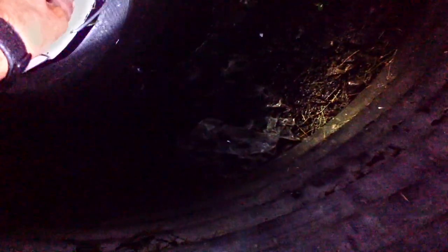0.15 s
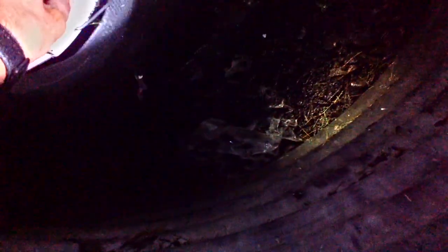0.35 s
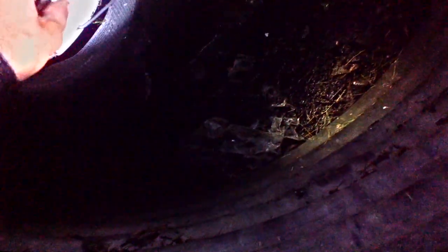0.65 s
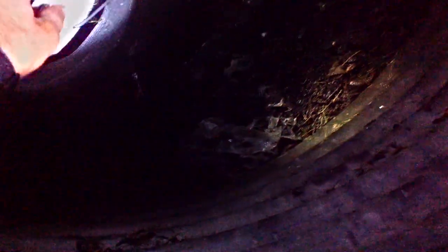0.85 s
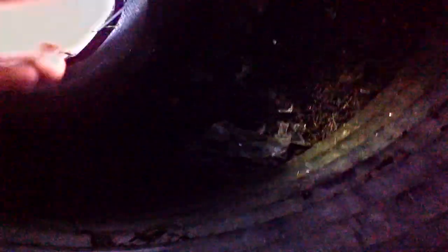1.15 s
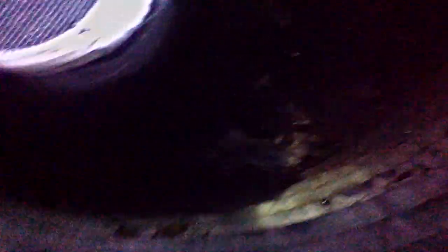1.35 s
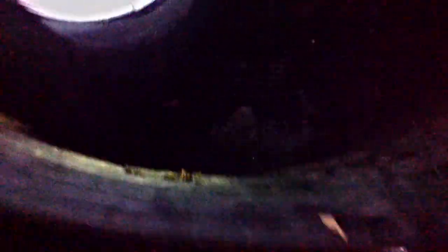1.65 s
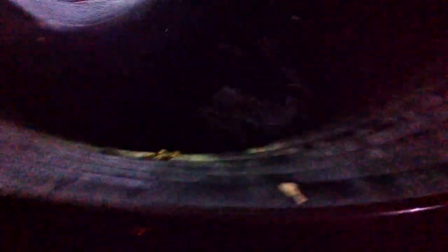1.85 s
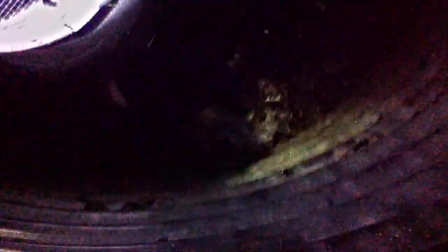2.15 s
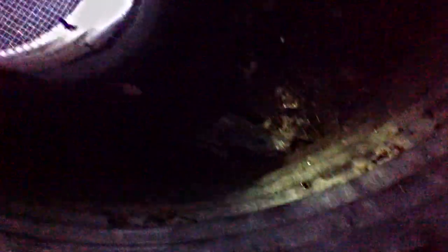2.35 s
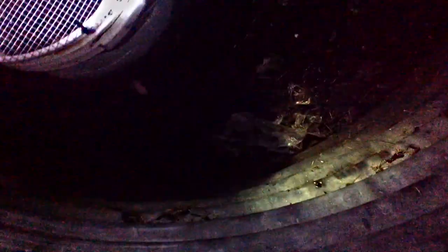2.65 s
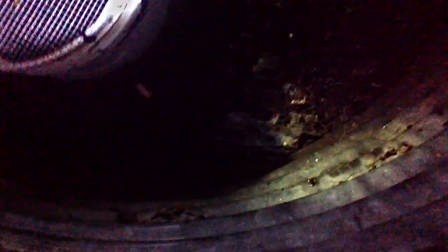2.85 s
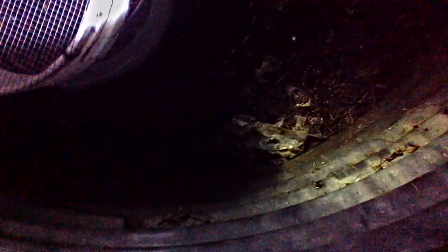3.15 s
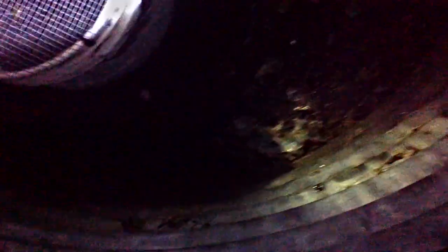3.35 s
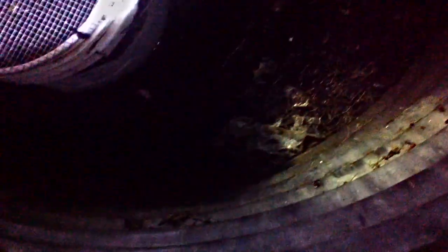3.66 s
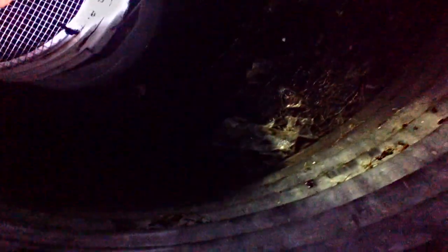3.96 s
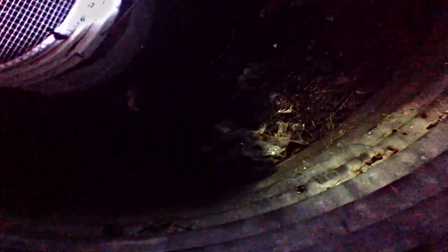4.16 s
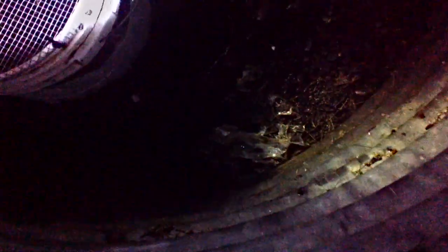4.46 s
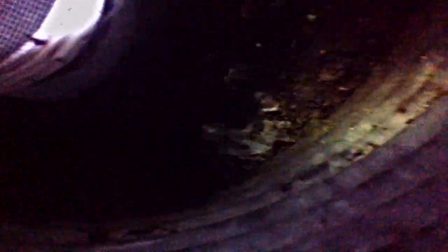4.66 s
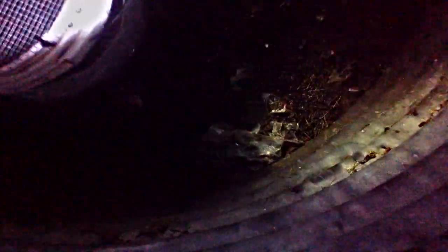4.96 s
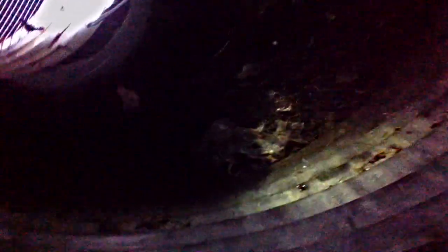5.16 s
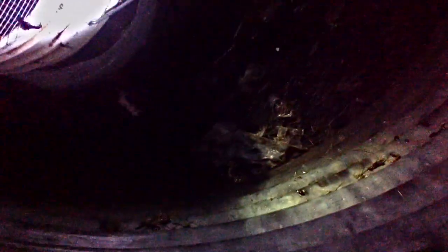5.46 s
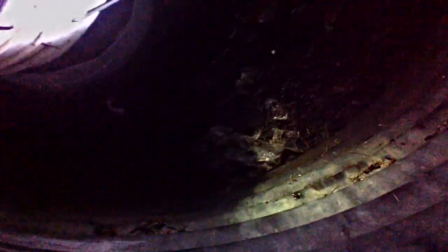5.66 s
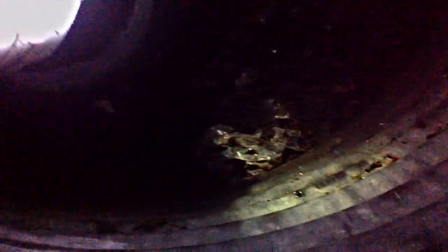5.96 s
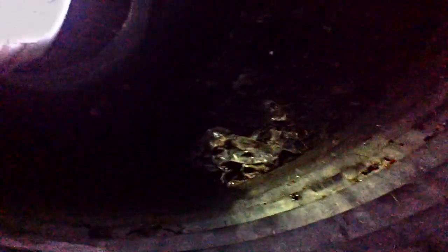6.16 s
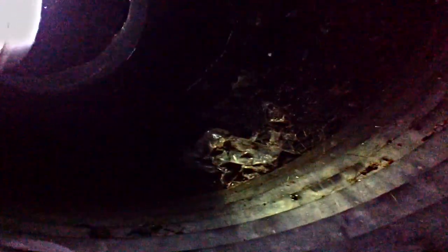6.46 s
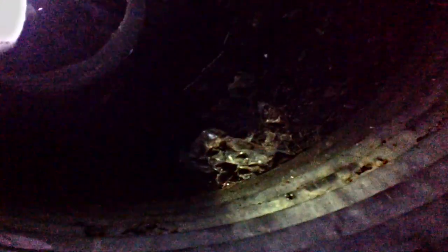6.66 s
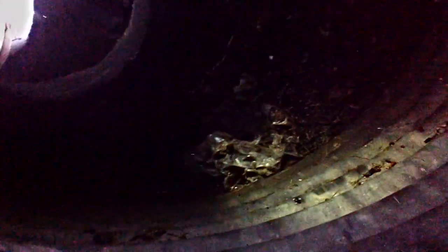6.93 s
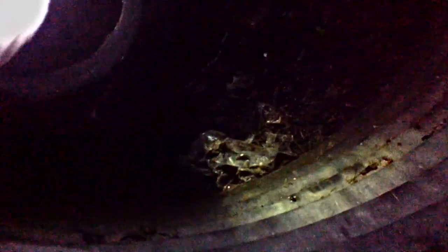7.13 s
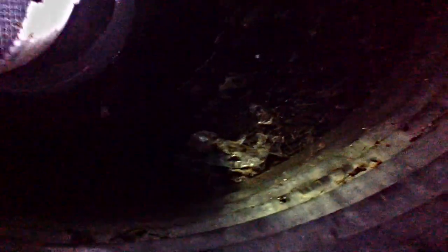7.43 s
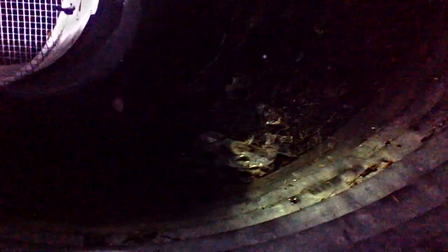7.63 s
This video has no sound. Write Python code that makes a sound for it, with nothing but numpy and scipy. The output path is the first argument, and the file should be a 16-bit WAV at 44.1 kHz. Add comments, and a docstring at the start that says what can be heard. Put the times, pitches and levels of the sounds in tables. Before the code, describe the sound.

Water drips and plops ringingly inside a ribbed drain pipe over a thin trickling stream, while wind rumbles and thumps on the microphone.

```python
"""Water drops splash in a ribbed drain pipe: they slap its cross modes into ringing, throw noisy spray
and mist, and trap bubbles that sing as damped sines. A stream of patchy noise and tiny bubbles runs
below, and a short noise tail stands for the echo. Wind gusts rumble, throb and flutter on a small
microphone in the pipe's mouth; low knocks are wind pops where loud, probably thuds of drops where
quiet. The strongest peaks overload it. Behind are a low hum of air and a hollow wash of far water."""
import sys
import numpy as np
from scipy import signal
from scipy.fft import rfft, irfft, next_fast_len
from scipy.io import wavfile
from scipy.ndimage import uniform_filter1d, map_coordinates

SR = 44100
rng = np.random.default_rng(int(sys.argv[2]) if len(sys.argv) > 2 else 0)


def generate_wav(signal):
    """Clip the signal to [-1, 1] and save it as 16-bit WAV at the path in sys.argv[1]."""
    frames = np.transpose(np.atleast_2d(signal))
    scaled = np.clip(frames, -1, 1) * 32767
    pcm = np.round(scaled).astype(np.int16)
    wavfile.write(sys.argv[1], SR, pcm)


N = 343519

# colour of a drop's own knock and of a low knock's bright edge: (frequency [Hz], relative level [dB])
KNOCK_COLOUR = [(250, -66), (500, 6), (800, 0.5), (1200, -18), (2000, -26), (5000, -80)]


def drops():
    """Each drop slaps the water into the pipe's modes, throws spray and mist and traps a few bubbles."""
    # the clearest drops, before each layer's trim: (time [s], peak [dB], bubble pitch [Hz],
    # slap [dB re peak], spray [dB re peak], mist [dB re peak], bubble [dB re peak])
    clear_drops = [(0.0867, -19, 1840, -6, -20, -16, -4.5), (0.2204, -19.5, 1520, -26, -24, -14, -2),
                   (0.2578, -20, 3200, -22, -12, -29, -3), (0.4508, -27, 1030, -16, -5, -7, -5),
                   (0.6324, -23, 6130, -19, -3.5, -12, -7), (0.7761, -24.5, 8410, -16, -8, -19, -3),
                   (0.859, -24.5, 1460, -21, -9, -8, -10), (0.9388, -16, 8600, -8.5, -14, -24, -3.5),
                   (0.9822, -22, 9920, -15, -17, -11, -4), (0.9916, -17.5, 2340, -21, -5, -7, -4.5),
                   (1.0585, -7.5, 4510, -13, -24, -9, -3), (1.1129, -19, 6200, -28, -12, -16, -2.5),
                   (1.1835, -24.5, 1610, -17, -10, -6, -14), (1.341, -24, 1830, -8, -10, -25, -4),
                   (1.3907, -17, 3120, -10, -3.5, -10.5, -4),
                   (1.4686, -13.5, 1840, -12, -12.5, -10.5, -3.5), (1.5648, -23, 1620, -2, -8, -21, -3),
                   (1.6212, -19, 1810, -10, -8.5, -18, -3), (1.6736, -24.5, 8800, -17, -26, -6, -3),
                   (1.697, -24, 2220, -8, -23, -25, -1), (1.735, -24, 1620, -9, -26, -25, -3),
                   (1.8056, -32, 1590, -9, -23, -27, 2), (1.948, -17, 8400, -20, -31, -5, -2),
                   (1.9834, -30, 1380, -20, -16, 0, -7), (2.0812, -18, 2140, -6, -10, -35, -3.5),
                   (2.139, -24, 2760, -16, -7, -18, -4), (2.1565, -13.5, 4660, -10, -7, -13.5, -5.5),
                   (2.2004, -26, 1350, 0, -7, -2, -12), (2.2593, -20.5, 2480, -15, -19, -36, -1),
                   (2.2917, -10, 2780, -18, -15, -31, -2), (2.4418, -21.5, 2810, -14, -15, -9, -3),
                   (2.5122, -26, 6690, -14, -13, -15, -3), (2.5287, -21, 1540, -14, -25, -18, -2),
                   (2.665, -27.5, 7600, -20, -12, -10, 2), (2.6908, -19.5, 1710, -1.5, -7.5, -8, -6),
                   (2.7382, -16.5, 8000, -11, -6, -10, -7), (2.798, -20, 9710, -22, -21, -10, -1),
                   (2.8509, -20, 2160, -22, -12, -11, -9), (2.8714, -10.5, 2800, -8.5, -11, -19, -3),
                   (2.9088, -11, 1590, -9, -4, -14, -4), (2.9362, -13, 1740, -11, -0.5, -5.5, -5),
                   (3.028, -25, 1500, -3, -28, -26, -8), (3.1163, 0, 1790, -8, -5, -26, -4.5),
                   (3.1941, -17, 3080, -14, -29, -33, -2), (3.3817, -14.5, 1570, -5.5, -3.5, -8, -20),
                   (3.4511, -13, 2380, -5.5, -21, -43, -0.5), (3.684, -22.5, 1550, -1, -11, -12, -7),
                   (3.7359, -3.5, 1456, -11, -18, -20, -4), (3.8691, -34, 1090, -6, -13, -22, -9),
                   (3.9225, -23.5, 2150, -17, -2.5, -7, -4), (4.129, -29.5, 2900, -18, -19, -25, 3),
                   (4.1874, -33, 1080, -18, -16, -6, -11), (4.2343, -16, 1540, -10, -2.5, -11, -3),
                   (4.2572, -10.5, 1490, -15, -23, -12.5, -2), (4.5655, -19, 1710, -17, -20, -33, -1.5),
                   (4.6147, -23.5, 1490, -5, -11, -13, -9), (4.6872, -18, 9200, -15, -9, -9, -7),
                   (4.7566, -24, 1070, -16, -3, -1, -4), (4.8448, -20.5, 1530, -6, -10, -17, -8),
                   (4.8908, -14, 6870, -14, -10, -11, -1.5), (5.0285, -20, 1590, -24, -17, -10, -3),
                   (5.2739, -27, 2700, -8, -13, -23, 0), (5.3232, -24.5, 1600, -9, -23, -13, 0.5),
                   (5.376, -22.5, 5750, -11, -10, -5, -6), (5.47, -21.5, 1040, -9, -7, -14, -5.5),
                   (5.5253, -15, 1560, -14, -18, -22, -2), (5.5872, -20, 3180, -5, -20, -18, -3),
                   (5.655, -21, 1750, -26, -28, -30, -0.5), (5.8197, -5, 1480, -2, -8.5, -20, -8.5),
                   (5.876, -14.5, 1390, -1.5, -21, -21, -6), (5.9399, -16.5, 2230, -6.5, -24, -32, -2),
                   (6.0826, -12, 1450, -1.5, -11.5, -21, -4), (6.164, -25, 1520, -5, -23, -33, -4),
                   (6.2148, -15.5, 2180, -30, -19, -42, -2), (6.258, -20.5, 1990, -14, -8, -17, -6),
                   (6.5286, -30, 1520, -14, -13, -25, 0), (6.5665, -16.5, 2480, -23, -17, -34, -2),
                   (6.5954, -22, 2070, -11, -10, -29, -5), (6.6089, -10, 2860, -30, -18, -22, -3.5),
                   (6.6837, -20, 1800, -14, -19, -24, -2), (6.8219, -21.5, 1870, -15, -2, -5, -6),
                   (6.8533, -22.5, 1630, -5, -17, -19, -6), (6.8996, -22.5, 1620, -10, -8, -20, -4),
                   (6.9451, -19, 1940, -25, -27, -35, -2.5), (7.0658, -28.5, 1100, -9, -0.5, -4, -14),
                   (7.1844, -23, 1080, -2.5, -11, -13, -6), (7.1975, -19.5, 6400, -20, -12.5, -16, -2),
                   (7.2544, -20, 1670, -5, -8, -13, -4), (7.2688, -15, 1020, 2, -1.5, -13, -9),
                   (7.3332, -31, 2260, -17, -17, -9, -8), (7.3512, -16.5, 1550, 3.5, -13, -15.5, -5),
                   (7.3906, -13, 2380, -5, -21, -18, -5.5), (7.4395, -22.5, 1060, 1, -13, -24, -2),
                   (7.4644, -15, 1110, -2.5, -27, -22, -4), (7.5113, -15, 2470, 0.5, -9, -18, -4),
                   (7.5697, -28, 1100, -7, -18, -25, -6), (7.5852, -18.5, 1060, 3.5, -6, -24, -9),
                   (7.633, -19.5, 1030, -7, -11, -23, -6), (7.649, -14.5, 2240, -3.5, -18, -25, -4.5),
                   (7.7408, -22.5, 1000, 1, -16, -17, -7)]
    # colours of coarse spray and fine mist: (frequency [Hz], relative level [dB])
    spray_colour = [(1500, -13), (3200, 1), (4500, 1), (7000, -1.5), (8500, -11.5), (12000, -44)]
    mist_colour = [(4000, -46), (7000, -3.5), (8500, 0.5), (10500, -2.5), (14500, -9), (22050, -20)]
    rows = np.vstack([clear_drops, small_drops()])
    s, db, hz, slap_db, spray_db, mist_db, bubble_db = rows.T
    fade_db = -27.5  # fade of slap and knock per 50 ms; spray and mist fade faster
    tick_fade_db = -150  # per 50 ms: the first contact is a dry click
    swell = 0.0054 * amp(0.35 * db)  # rise time [s]: more water takes longer to land
    grain = amp(2.24 * wobble(250))  # a splash is many droplets
    wash_slap, wash_spray = washes()

    def driven_modes(f):
        return pipe(f) * f ** 2 / (f ** 2 + 800 ** 2)  # little drive below the first cross mode

    slap_level = bursts(np.abs(s - swell), db + slap_db - 7.5, fade_db, rise=swell) + wash_slap
    slap = slap_level * unit(grain * filtered(rng.standard_normal(N), driven_modes))

    spray_level = bursts(s, db + spray_db - 6.0, 1.15 * fade_db, rise=0.4 * swell)
    mist_level = bursts(s, db + mist_db - 5.0, 1.5 * fade_db, rise=0.00065)
    mist_level += bursts(s, db + mist_db - 16.5, tick_fade_db, rise=0.0002)
    spray = (spray_level + 1.1 * wash_spray) * unit(grain * rush(spray_colour, patchy_db=8.0))
    mist = (mist_level + wash_spray) * unit(grain * rush(mist_colour, patchy_db=-1.5))

    first = bubbles(s + 0.6 * swell, hz, amp(db + bubble_db), 3 + hz / 900, rise=0.0078)
    # three smaller bubbles of similar pitch follow
    draw = rng.random((len(s), 3, 2))
    late = s[:, None] + 0.00196 + (0.008 + 3 * swell[:, None]) * draw[..., 0]
    near = hz[:, None] * np.exp(0.31 * (draw[..., 1] - 0.5))
    late, near = late.ravel(), near.ravel()
    size = np.repeat(amp(db + bubble_db - 9.5), 3)

    knock_level = bursts(s, db + slap_db - 20.5, fade_db, rise=swell)
    knock = knock_level * rush(KNOCK_COLOUR, patchy_db=4.5)
    followers = bubbles(late, near, size, 2.7 + near / 1200, rise=0.028)
    return knock + slap + spray + mist + first + followers


def small_drops():
    """Faint drops that fall at random, as rows like those of the clear drops."""
    count = 45
    top_db, scatter_db = -24, 4  # highest peak, and scatter below it
    middle_hz, log_spread = 1980, 0.533  # bubble pitch before limiting
    # slap, spray, mist and bubble under the peak [dB], and the scatter of each [dB]
    mix_db, mix_scatter_db = (-12, -9.5, -14.5, -4.5), (6.6, 4.7, 3.6, 5.8)
    when = rng.random(count) * N / SR
    draw = rng.standard_normal((count, 2 + len(mix_db)))
    peak_db = top_db - scatter_db * np.abs(draw[:, 0])
    hz = np.clip(middle_hz * np.exp(log_spread * draw[:, 1]), 1000, 10000)
    return np.column_stack([when, peak_db, hz, mix_db + mix_scatter_db * draw[:, 2:]])


def washes():
    """Slap and spray gains of water sheets falling back after big splashes, sinking toward their end."""
    # sheets, before the layers' trims: (time [s], length [s], slap [dB], spray [dB])
    sheets = [(2.528, 0.091, -34.5, -43), (3.024, 0.12, -35.5, -41), (3.12, 0.036, -14.5, -19.5),
              (3.363, 0.22, -30.5, -36), (3.73, 0.072, -24, -34.5), (4.242, 0.14, -28, -31),
              (4.911, 0.042, -33, -33.5), (5.84, 0.33, -43, -55), (6.096, 0.79, -40.5, -51),
              (7.347, 0.3, -43, -47.5)]
    t = np.arange(N) / SR
    lift = np.zeros((2, N))
    for s, length, *db in sheets:
        part = (t - s) / length
        grow = np.clip(part / 0.077, 0, 1)
        sink = np.clip((1.25 - part) / 1.38, 0, 1)
        lift += amp(db)[:, None] * grow * sink
    return lift


def pipe(hz):
    """Response of the pipe's cross modes: resonances across its width, with alternating sign."""
    # cross modes: (frequency [Hz], width [Hz], relative level [dB])
    cross_modes = [(1043, 61, 2), (1512, 156, 4), (1774, 550, -3), (2310, 325, -1.5), (3000, 610, -14),
                   (4450, 480, -14)]
    total = 0
    for k, (centre, width, db) in enumerate(cross_modes):
        loss = 1j * hz * width
        total = total + (-1) ** k * amp(db) * loss / (centre * centre - hz * hz + loss)
    return total


def bubbles(start, hz, size, cycles, rise):
    """Trapped air rings as damped sines; a positive rise glides the pitch up, as near the surface."""
    step = np.arange(1024)
    turns = hz[:, None] * step / SR
    life = turns / cycles[:, None]  # age in decay times
    tone = np.sin(2 * np.pi * turns * (1 + rise * np.minimum(life, 3)))
    ring = tone * np.exp(-life) * (1 - np.exp(-turns / 0.53))
    where = np.round(start * SR).astype(int)[:, None] + step
    return np.bincount(where.ravel(), (size[:, None] * ring).ravel(), N + SR)[:N]


def stream():
    """Running water: noise of the flow, small splashes that make it flare, and a crowd of tiny bubbles."""
    # base levels of the flow, before trims: (time [s], gurgle [dB], fizz [dB])
    flow_levels = [(0.0, -38, -39), (0.5, -41.5, -40), (1.65, -41, -43.5), (2.62, -44.5, -42.5),
                   (3.03, -40, -44), (3.84, -43, -42), (5.6, -40, -40), (6.27, -36, -44.5),
                   (6.88, -43, -44.5), (7.22, -40, -49), (7.48, -41, -43), (7.79, -36, -38)]
    # colours of low gurgle and high fizz: (frequency [Hz], relative level [dB])
    gurgle_colour = [(300, -3), (670, -8.5), (900, -22.5), (1060, -6), (1200, -13), (1620, -3),
                     (2400, -8.5), (3700, -14.5), (7000, -23)]
    fizz_colour = [(1500, -18), (3000, 2), (4500, -1.5), (6500, 0), (9300, -1), (11500, -5.5),
                   (14500, -13.5), (22050, 3)]
    gurgle_db, fizz_db = curves(flow_levels)

    # each small splash makes the noise flare and fade
    draw = rng.random((260, 2))
    kick_size = amp(-7 * np.log(draw[:, 1] + 0.033))
    kicks = np.bincount((draw[:, 0] * N).astype(int), kick_size, N)
    fade = amp(-60 * np.arange(SR // 5) / SR / 0.037)  # 60 dB in 37 ms
    patter = 0.4 + 0.2 * signal.fftconvolve(kicks, fade)[:N]
    gurgle = unit(patter ** 0.92 * rush(gurgle_colour, patchy_db=3.5))
    fizz = unit(patter * rush(fizz_colour, patchy_db=4.5))
    flow = amp(gurgle_db - 3.0) * gurgle + amp(fizz_db - 1.0) * fizz

    draw, spread = rng.random((4000, 3)), rng.standard_normal(4000)
    hz = np.clip(2200 * np.exp(0.8 * spread), 700, 13000)
    size = amp(-4.5 * np.log(draw[:, 1] + 0.018))
    crowd = bubbles(draw[:, 0] * N / SR, hz, size, 1 + 3.5 * draw[:, 2], rise=0.03)
    return flow + amp(gurgle_db - 7) * unit(crowd)


def echo(x):
    """The ribbed wall scatters sound into a short noise tail, redrawn as the water moves."""
    # the pipe's tail: (frequency [Hz], time to fade by 60 dB [s])
    tail_times = [(300, 0.22), (2000, 0.042), (10000, 0.042)]
    out = np.zeros(N + SR)
    hop = SR // 4  # a new tail every quarter second
    for a in range(0, N, hop):
        hz, t, z = signal.stft(rng.standard_normal(SR // 6), SR, nperseg=128)
        fade = amp(-60 * t / along(tail_times, hz)[:, None])
        tail = signal.istft(z * fade, SR, nperseg=128)[1]
        wet = signal.fftconvolve(x[a:a + hop], tail / np.linalg.norm(tail))
        out[a + 60:][:len(wet)] += wet  # delayed by 60 samples
    return out[:N]


def wind():
    """Eddies of three sizes push the membrane as bands of noise; the smaller two come in lumps."""
    # base levels of the gusts, before the eddies: (time [s], rumble [dB], throb [dB], flutter [dB])
    gusts = [(0.0, -31, -34, -48), (0.11, -26, -24.5, -42), (0.28, -38, -34.5, -49), (0.6, -27.5, -29, -47),
             (1.6, -43, -45.5, -50), (1.71, -11.5, -27, -35), (1.78, -28.5, -36.5, -46),
             (2.23, -32, -37.5, -44), (2.3, -18, -23, -46), (2.43, -35, -39, -49), (2.58, -23, -39, -43),
             (2.62, -21, -21, -27.5), (2.65, -18.5, -33, -52), (2.78, -38, -42, -43), (2.82, -15, -28, -45),
             (2.93, -26, -16.5, -35), (2.97, -7, -31, -21.5), (3.08, -13.5, -14, -30),
             (3.17, -9.5, -17, -19.5), (3.21, -24, -27, -47), (3.25, -18.5, -30, -41),
             (3.38, -18.5, -19.5, -36.5), (3.54, -22.5, -38, -41), (3.66, -19.5, -26, -39),
             (3.75, -13, -14, -22.5), (3.9, -19.5, -19, -31), (3.93, -6.5, -15.5, -20),
             (4.08, -21.5, -22.5, -29.5), (4.17, -4, -15.5, -19.5), (4.21, -18, -21, -35),
             (4.32, -24, -22, -34), (4.36, -24, -34, -44), (4.42, -17.5, -18, -37), (4.64, -30, -37, -51),
             (4.77, -14.5, -19, -29), (4.86, -22.5, -18.5, -28), (4.92, -23, -27, -42.5),
             (5.29, -21.5, -24.5, -40), (5.34, -35.5, -41, -47.5), (5.51, -28.5, -32, -41.5),
             (6.27, -34.5, -36.5, -43), (6.42, -19, -29, -40), (6.53, -31.5, -41, -42.5),
             (6.66, -10, -22, -35.5), (6.7, -33, -25.5, -51), (6.83, -37, -26.5, -32),
             (6.96, -8, -12.5, -21.5), (7.07, -32, -23, -41), (7.12, -14.5, -12.5, -25.5),
             (7.31, -16.5, -20, -26.5), (7.42, -12, -8.5, -15), (7.66, -18, -20.5, -18),
             (7.75, -14.5, -30, -42), (7.79, -25, -21, -22)]
    # colours of rumble, throb and flutter: (frequency [Hz], relative level [dB])
    rumble_colour = [(8, -30), (20, 3.5), (40, 4), (65, -5.5), (90, -14.5), (200, -42), (800, -120)]
    throb_colour = [(30, -27), (60, 6), (80, 6.5), (120, -3), (180, -15), (280, -38.5), (1000, -100)]
    flutter_colour = [(80, -17), (160, 1), (220, 0), (350, -10), (600, -21), (1000, -26), (2500, -66),
                      (6000, -120)]
    rumble_db, throb_db, flutter_db = curves(gusts)
    eddies = 2 * wobble(9)  # level swings inside a gust, in dB
    lumps = wobble(30)
    rumble = steady(rush(rumble_colour, patchy_db=0.0), 0.08)
    throb = steady(amp(7.5 * lumps) * rush(throb_colour, patchy_db=1.45), 0.069)
    flutter_lumps = amp(4.3 * lumps + 6.4 * wobble(50))
    flutter = steady(flutter_lumps * rush(flutter_colour, patchy_db=3.0), 0.041)
    blow = amp(rumble_db + 0.53 * eddies) * rumble
    blow += amp(throb_db + 0.82 * eddies) * throb
    return blow + amp(flutter_db + eddies) * flutter


def low_knocks():
    """A push, a short thud and a brighter edge: wind pops if loud, probably drops' low thuds if quiet."""
    # low knocks, before trims: (time [s], peak [dB], edge level [dB re peak], push pitch [Hz])
    # loud ones are wind pops on the microphone, quiet ones are probably drops' low thuds;
    knock_rows = [(0.945, -30, 2, 139), (1.055, -33.5, 1.5, 382), (1.157, -41, 0, 121),
                  (1.195, -37, 0, 484), (1.427, -26, 4, 476), (1.518, -24, -11, 363), (1.56, -33, 3, 180),
                  (1.697, -21, -22, 207), (2.056, -26, -12, 160), (2.151, -31, 6, 121),
                  (2.232, -39, 8, 121), (2.33, -22.5, -8, 498), (2.609, -23.5, -11, 184),
                  (2.688, -25.5, -1.5, 148), (2.962, -5.5, -36, 183), (2.995, -9.5, -33, 122),
                  (3.053, -16.5, -38, 121), (3.108, -12.5, -16, 120), (3.315, -18.5, -15, 143),
                  (3.704, -18, -18, 207), (3.748, -4, -21, 120), (3.801, -11, -29, 184),
                  (3.872, -22, -17, 123), (3.933, -2, -12, 190), (3.97, -23, -24, 121),
                  (4.039, -9, -26, 207), (4.111, -15.5, -27, 250), (4.155, -4.5, -32, 194),
                  (4.39, -21, -1, 135), (4.75, -33, -16, 121), (4.831, -5, -32, 141),
                  (5.262, -19, -10, 130), (5.471, -25.5, 0, 121), (5.544, -33, 7, 121),
                  (5.867, -32, -1, 175), (6.036, -31, 4, 121), (6.071, -29, 1, 280), (6.407, -30, 5, 155),
                  (6.856, -14.5, -15, 194), (6.902, -9.5, -17, 119), (6.937, -16, -23, 120),
                  (6.961, -10.5, -22, 118), (7.028, -27, -26, 121), (7.116, -5, -29, 163),
                  (7.192, -6, -20.5, 191), (7.252, -4.5, -25, 126), (7.333, -14.5, -14, 131),
                  (7.393, -5, -17, 193), (7.456, -0.5, -10.5, 136), (7.524, -2.5, -23, 123),
                  (7.554, -7, -19, 303), (7.623, -3.5, -20, 226), (7.686, -13.5, -19, 184),
                  (7.761, -22, -9, 150)]
    # colour of the thud: (frequency [Hz], relative level [dB])
    thud_colour = [(60, 7.5), (150, -2), (300, 0.5), (500, -18.5), (900, -58), (2000, -80)]
    s, db, edge_db, hz = np.transpose(knock_rows)
    size = amp(db + 5.5) * rng.choice([-1, 1], len(s))  # random sign
    # the push is a heavily damped sine, made with the same formula as a bubble
    push = bubbles(s, hz, size, np.full(len(s), 1.2), rise=-0.0011)
    thud = bursts(s, db - 6.0, -24, rise=0.0014) * rush(thud_colour, patchy_db=5.5)
    edge = bursts(s, db + edge_db, -46, rise=0.002) * rush(KNOCK_COLOUR, patchy_db=4.5)
    return push + thud + edge


def drone():
    """Air in the long pipe hums around its lowest note; water far down the pipe washes hollowly."""
    # colours of the hum and of the far water: (frequency [Hz], relative level [dB])
    hum_colour = [(20, -46), (40, -7), (64, 5.5), (90, -11), (130, -55), (300, -37.5)]
    hollow_colour = [(100, -37), (200, -14.5), (320, 1), (450, -1), (680, 1), (900, -12), (1300, -20),
                     (3000, -70)]
    hum = amp(-36.5 + 2.1 * wobble(3.675)) * rush(hum_colour, patchy_db=3.0)
    hollow_level = amp(-46.5 + 3.0 * wobble(3.44) + 2.3 * wobble(40))
    return hum + hollow_level * rush(hollow_colour, patchy_db=0.0)


def bursts(start, db, fade_db, rise):
    """Sum of envelopes that rise quickly and fade by fade_db (at least 3 dB) every 50 ms."""
    out = np.zeros(N + SR)
    t = np.arange(SR // 2) / SR
    for s, level, fade, up in np.broadcast(start, db, fade_db, rise):
        falling = amp(level + np.minimum(fade, -3) * t / 0.05)
        out[round(s * SR):][:len(t)] += falling * (1 - np.exp(-t / up))
    return out[:N]


def rush(spectrum, patchy_db):
    """Coloured noise of rms 1 with patches of random gain in time and frequency."""
    z = signal.stft(rng.standard_normal(N), nperseg=256)[2]
    field = uniform_filter1d(rng.standard_normal(z.shape), size=8, axis=0)
    field = uniform_filter1d(field, size=8, axis=1)
    noise = signal.istft(z * amp(patchy_db * unit(field)), nperseg=256)[1][:N]
    return unit(filtered(noise, lambda hz: amp(along(spectrum, hz))))


def steady(x, seconds):
    """x at rms 1, with its chance swells slower than about the given time evened out."""
    size = round(seconds * SR)
    power = uniform_filter1d(uniform_filter1d(x ** 2, size), size)
    return unit(x / np.sqrt(np.abs(power) + 0.4))


def wobble(rate):
    """A smooth random curve through `rate` random points a second."""
    points = rng.standard_normal(int(N * rate / SR) + 4)
    return map_coordinates(points, [np.arange(N) * rate / SR])


def filtered(x, response):
    """x with each frequency multiplied by a response, which may be complex."""
    m = next_fast_len(N + SR // 2)
    return irfft(rfft(x, m) * response(np.fft.rfftfreq(m, 1 / SR)), m)[:N]


def curves(rows):
    """One value per sample for each column after the time, joined by straight lines."""
    s, *cols = np.transpose(rows)
    return [np.interp(np.arange(N) / SR, s, c) for c in cols]


def along(points, hz):
    """Value at hz between (frequency, value) points, on a log frequency axis."""
    f, v = np.transpose(points)
    return np.interp(np.log(hz + 1), np.log(f + 1), v)


def amp(db):
    """Gain of a level in dB."""
    return 10 ** (np.asarray(db) / 20)


def unit(x):
    """x scaled to rms 1."""
    return x / np.sqrt(np.mean(x ** 2) + 1e-20)


def scene():
    """Water echoes in the pipe; wind, low knocks and drone are added without echo."""
    water = stream() + drops()
    return (water + amp(-9) * echo(water) + wind() + low_knocks() + drone())[None]


def record(dry):
    """The input clips smoothly on strong peaks and keeps only its own frequency band."""
    limit, low_hz, top_hz = 0.97, 5, 14250  # clipping level (full scale = 1) and band edges
    clipped = dry[0] / (1 + np.abs(dry[0] / limit) ** 8) ** (1 / 8)
    return filtered(clipped, lambda hz: (hz < top_hz) & (hz > low_hz))[None]


dry = scene()
out = record(dry)
generate_wav(out)
```